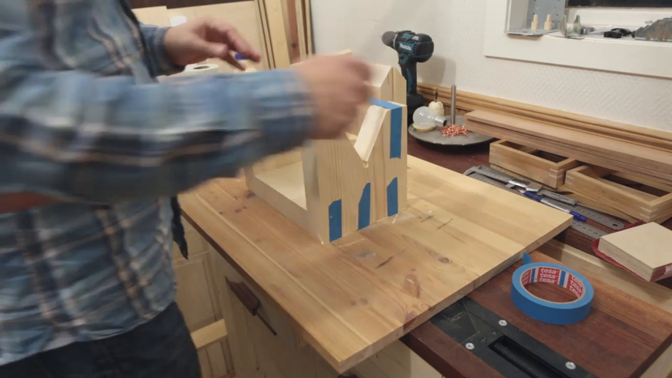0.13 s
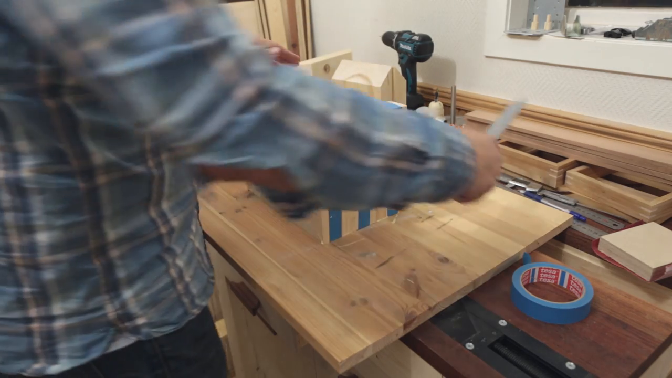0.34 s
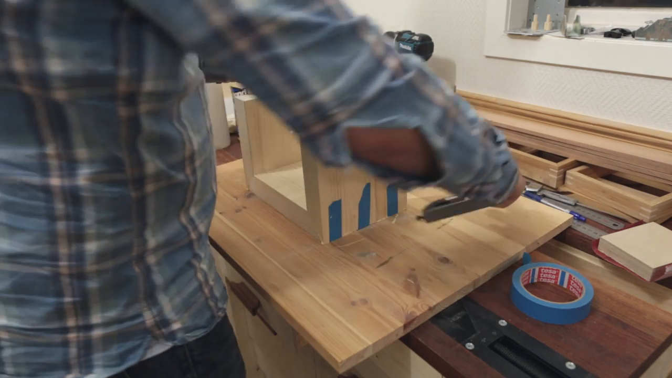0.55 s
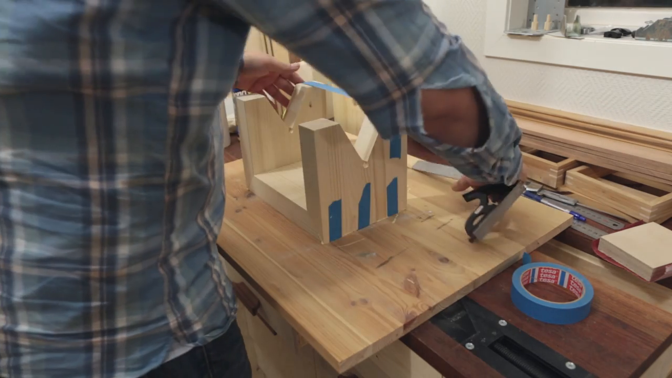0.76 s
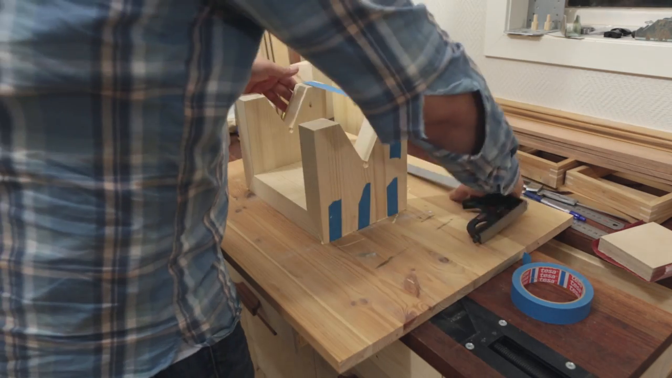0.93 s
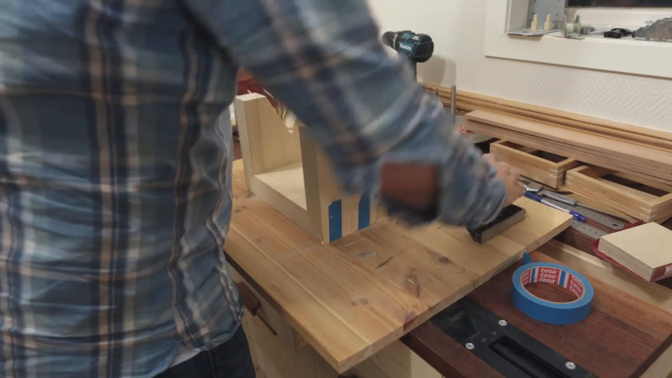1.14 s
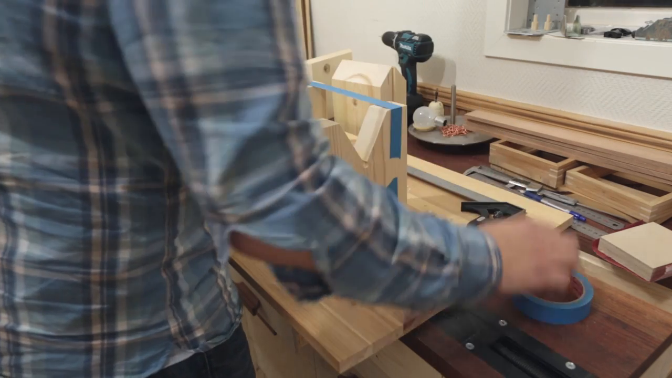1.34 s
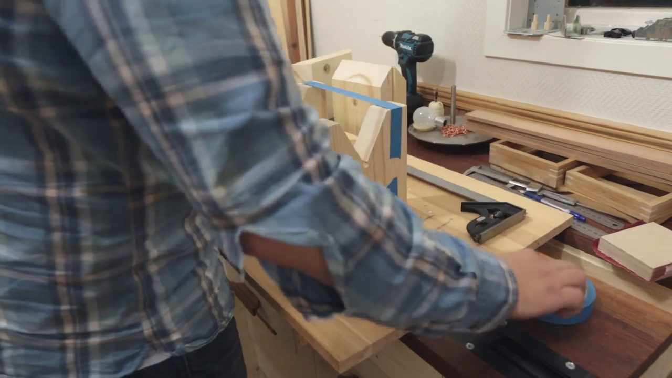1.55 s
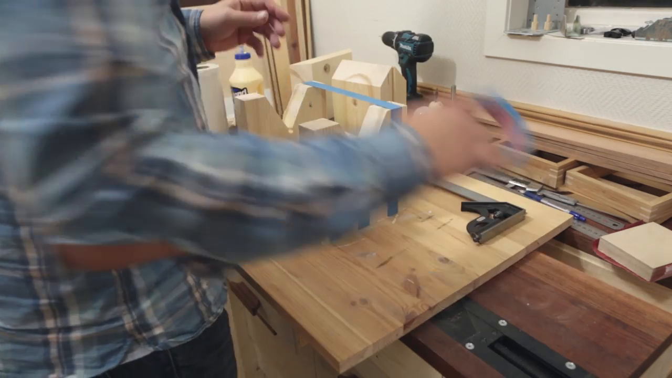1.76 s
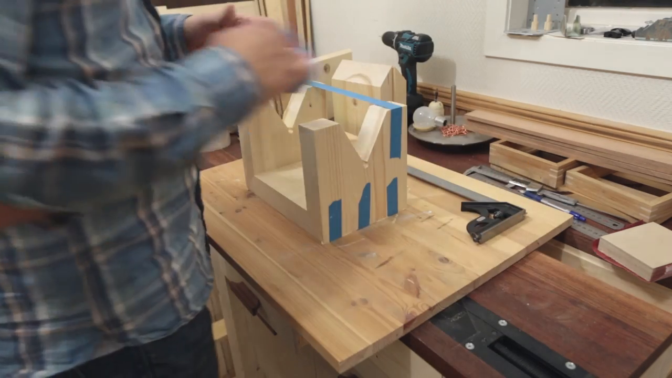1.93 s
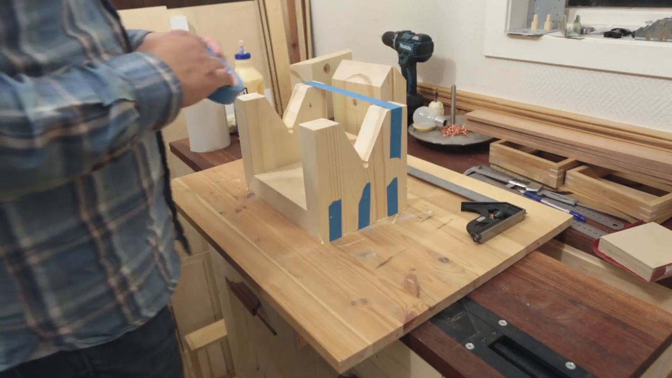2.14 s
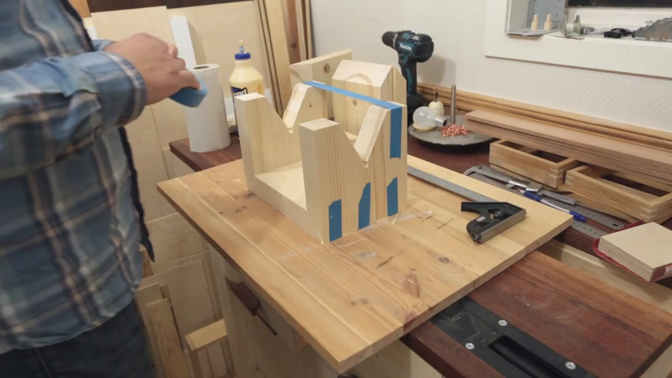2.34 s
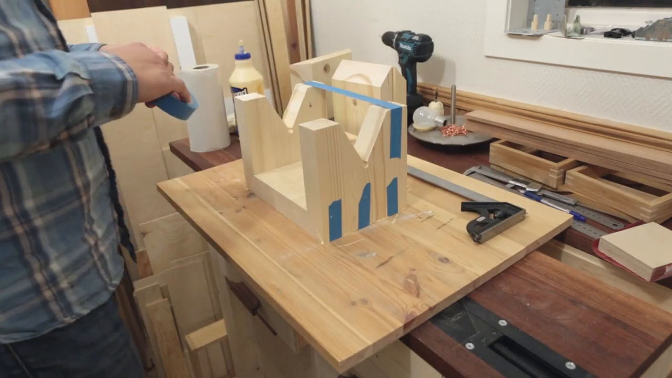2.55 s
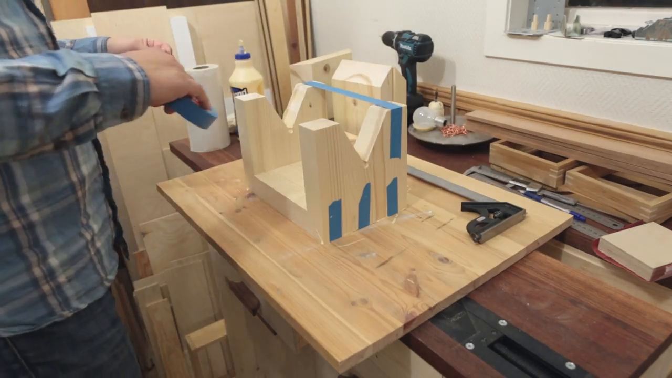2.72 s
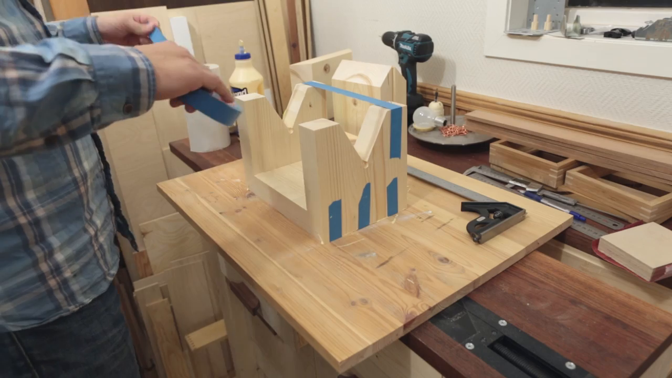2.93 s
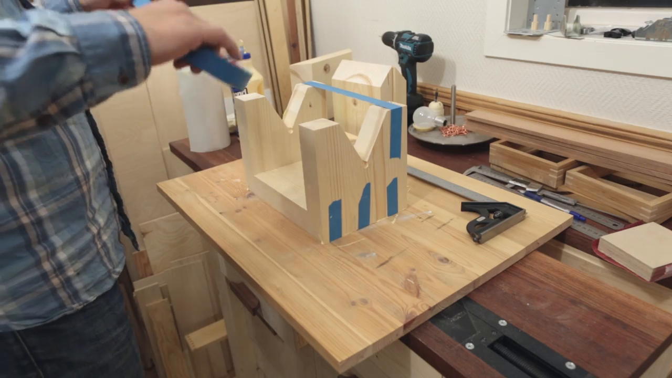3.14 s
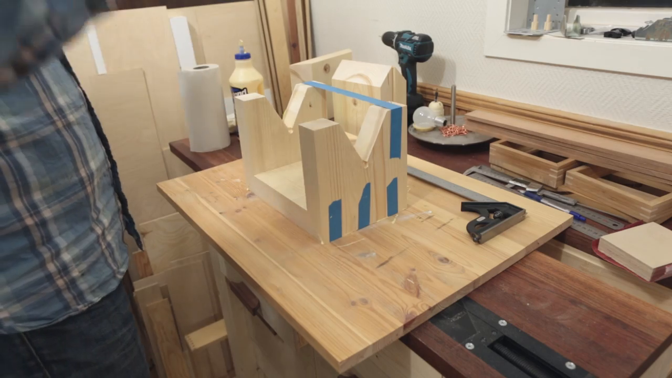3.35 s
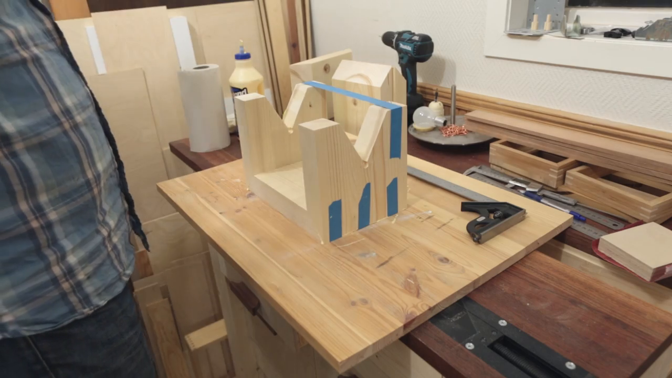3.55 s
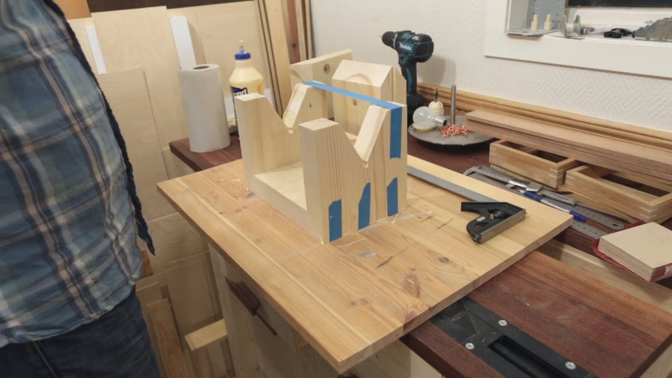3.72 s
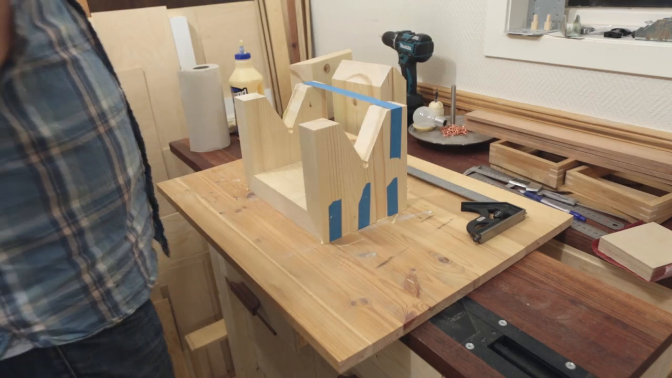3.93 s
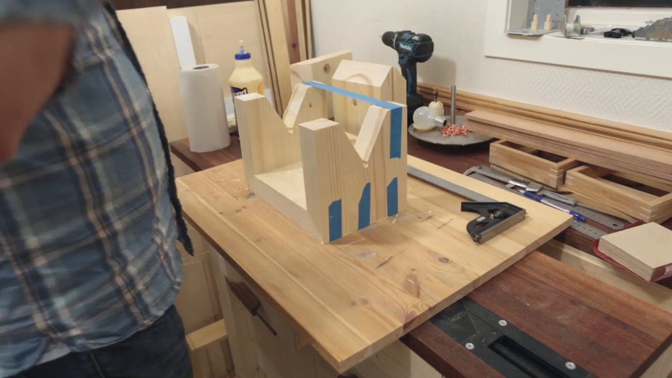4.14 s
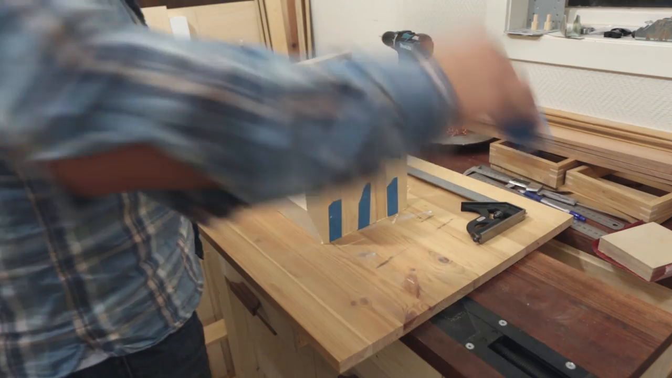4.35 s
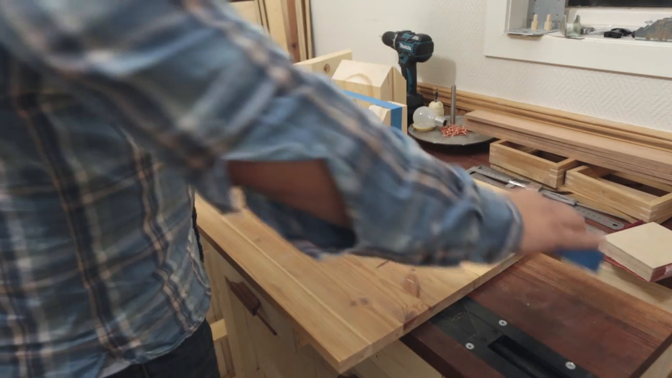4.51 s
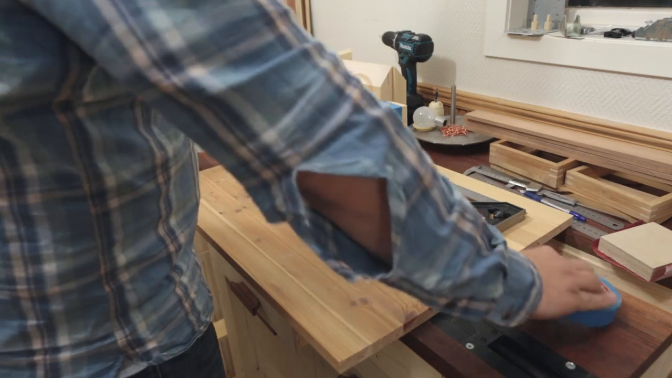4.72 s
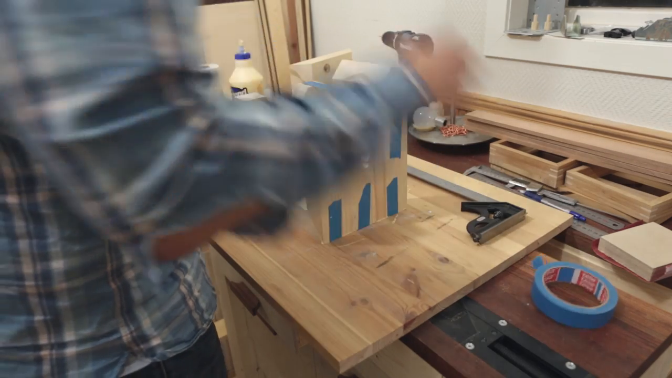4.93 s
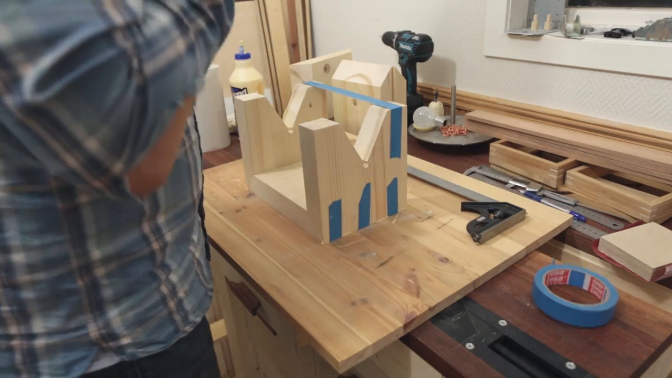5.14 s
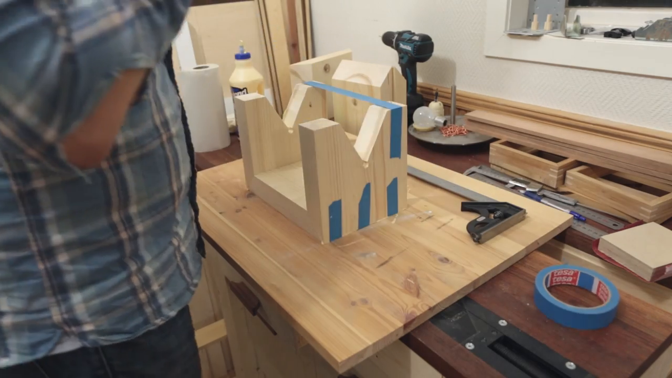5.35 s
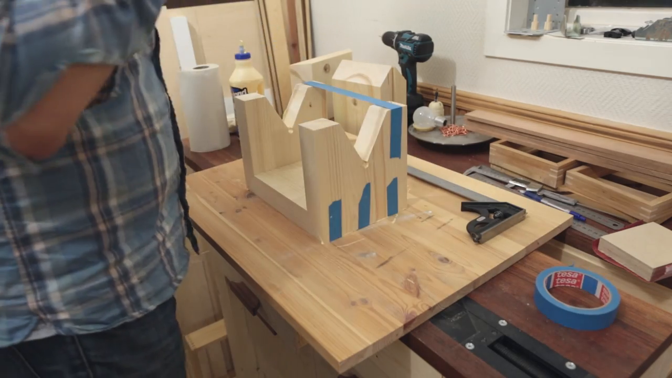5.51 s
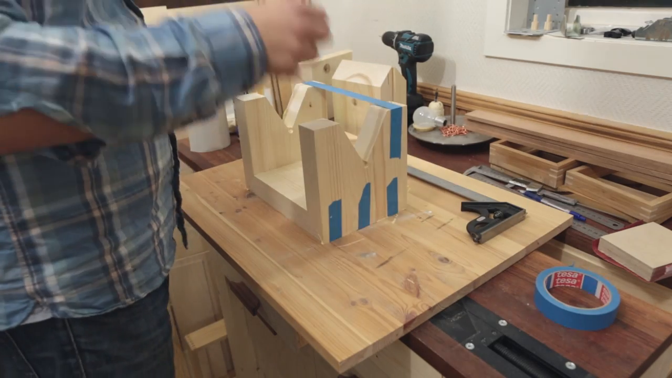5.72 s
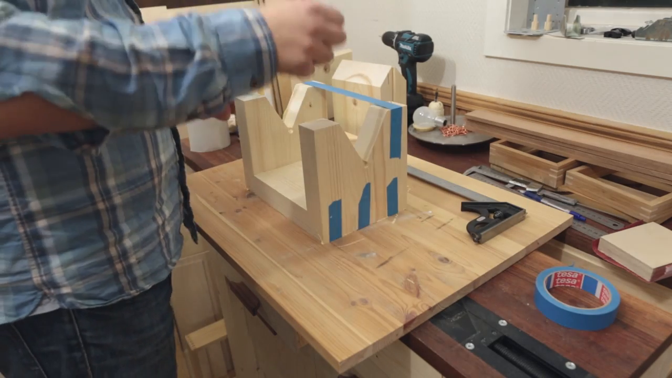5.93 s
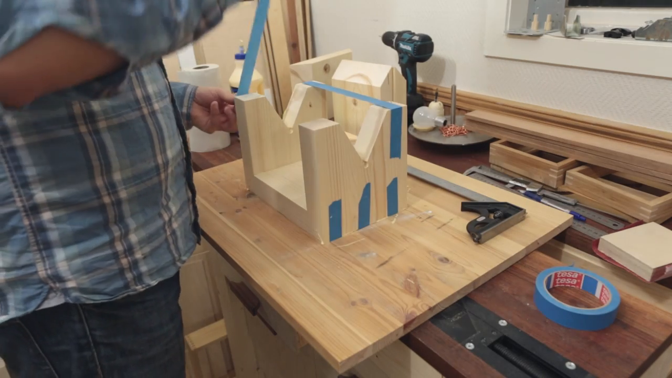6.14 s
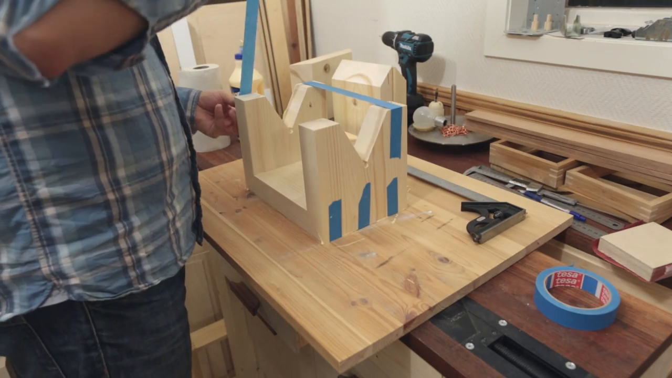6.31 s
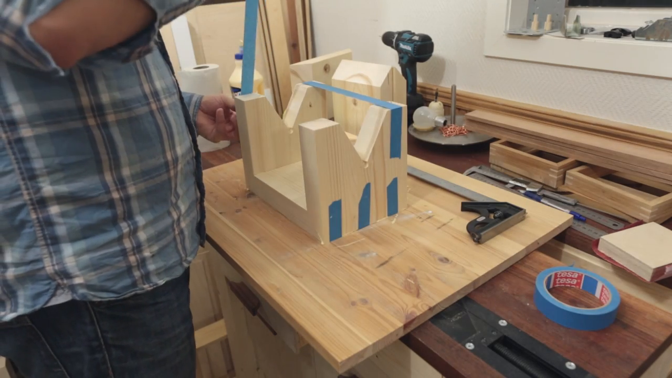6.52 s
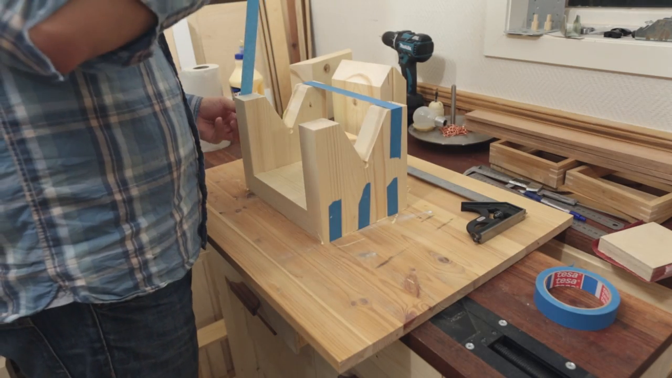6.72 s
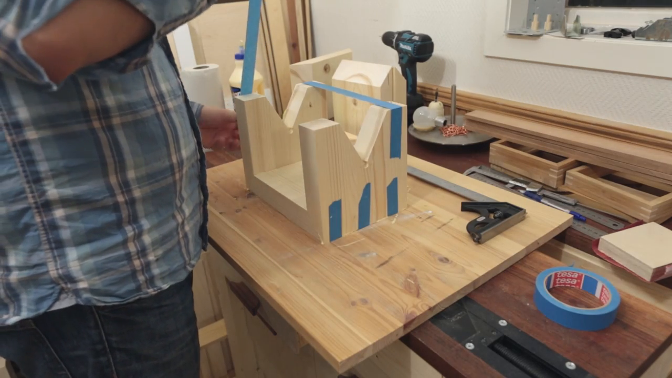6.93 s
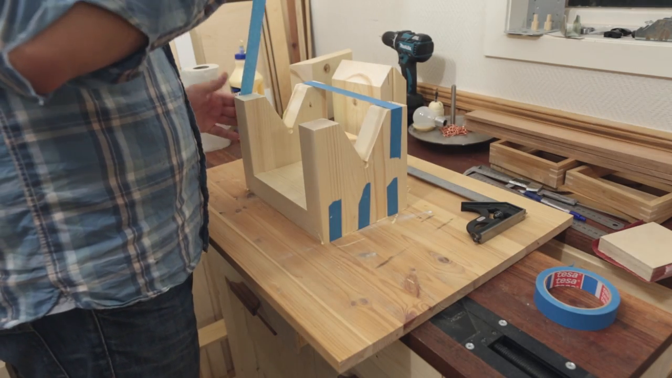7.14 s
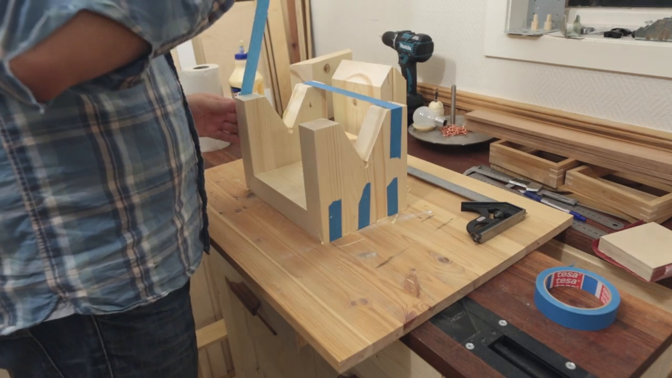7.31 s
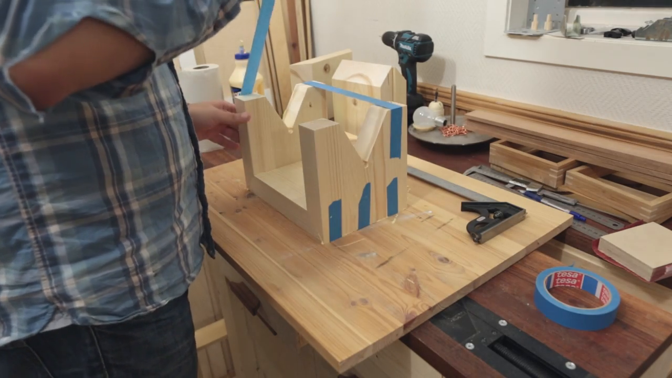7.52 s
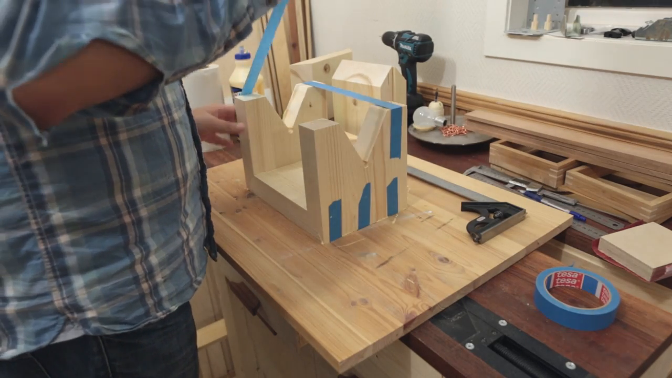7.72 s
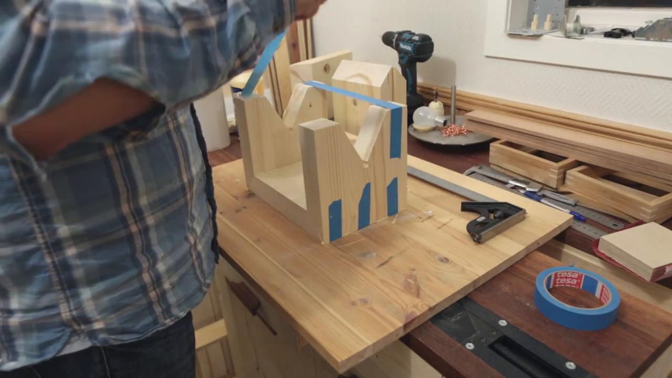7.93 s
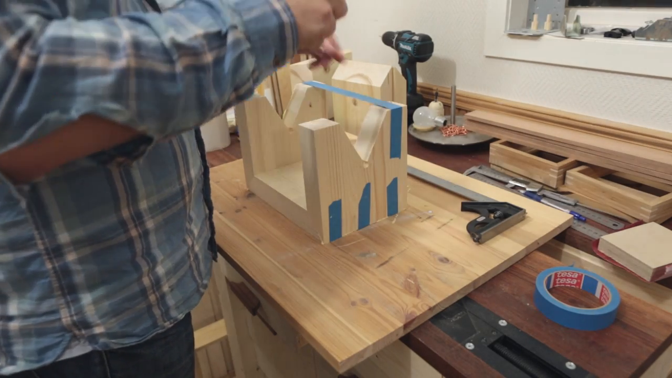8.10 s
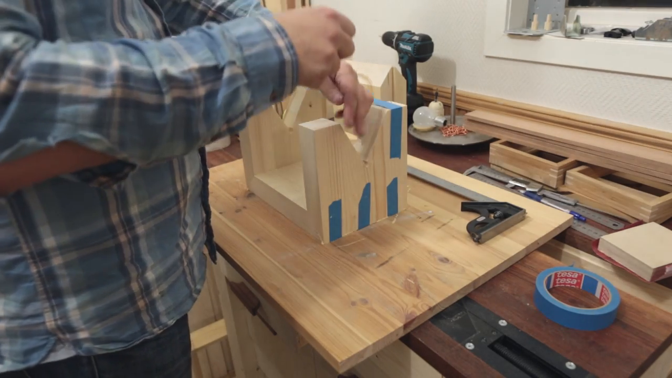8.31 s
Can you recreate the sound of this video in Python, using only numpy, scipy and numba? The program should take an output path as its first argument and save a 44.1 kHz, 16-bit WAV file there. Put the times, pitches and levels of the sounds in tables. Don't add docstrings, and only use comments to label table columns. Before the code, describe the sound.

Workshop handling: a hand knock, a hard metal-on-wood clatter, harsh peeling and tearing of tape, a roll rocking faster until flat, faint smoothing rustles.

```python
import sys
import numpy as np
from scipy import signal
from scipy.fft import rfft, irfft
from scipy.io import wavfile
from scipy.ndimage import uniform_filter1d
from numba import njit

SR = 44100
rng = np.random.default_rng(int(sys.argv[2]) if len(sys.argv) > 2 else 0)


def int16_out(signal):
    q = np.round(np.clip(np.atleast_2d(signal).T, -1, 1) * 32767)
    wavfile.write(sys.argv[1], SR, q.astype(np.int16))


def natural_amplitude(level_db):
    exponent = np.asarray(level_db, float) / 20
    return 10 ** exponent


N = 369116


def at_hz(points, hz):
    table = np.array(points)
    return np.interp(np.log(hz), np.log(table[:, 0]), table[:, 1])


def rms_one(x):
    return x / np.sqrt(np.mean(x ** 2) + 1e-20)


def in_time(tables):
    t, rows = np.arange(N) / SR, np.vstack(tables)
    gate = sum((t >= p[0][0]) & (t < p[-1][0]) for p in tables) * 1.
    columns = [np.interp(t, rows[:, 0], c) for c in rows.T[1:]]
    return uniform_filter1d(gate, size=64), columns


def coloured(x, points):
    hz = np.maximum(np.arange(N // 2 + 1) * SR / N, 10)
    return rms_one(irfft(rfft(x) * natural_amplitude(at_hz(points, hz)), N))


def passband(x, lo_hz, hi_hz):
    band_hz = [lo_hz, min(hi_hz, .45 * SR)]
    return signal.sosfilt(signal.butter(2, band_hz, "band", fs=SR, output="sos"), x)


def ring(clicks, hz, t60):
    r, w = natural_amplitude(-60 / (t60 * SR)), 2 * np.pi * hz / SR
    return signal.lfilter([0, np.sin(w)], [1, -2 * r * np.cos(w), r * r], clicks + 1e-18)


@njit
def gliding(x, hz, r, sr):
    y = np.zeros(len(x))
    for i in range(2, len(x)):
        y[i] = x[i] - x[i - 2] + 2 * r * np.cos(2 * np.pi * hz[i] / sr) * y[i - 1] - r * r * y[i - 2]
    return y


def grains(per_s, spread_db):
    heights = natural_amplitude(spread_db * np.minimum(rng.exponential(1, N), 5))
    sizes = rms_one(heights) * rng.choice([-1, 1], N)
    chance = np.clip(per_s / SR, 1e-4, 1)
    return sizes * (rng.random(N) < chance) / np.sqrt(chance)


def strokes(rows):
    t, out = np.arange(N) / SR, np.full((2, N), -150.)
    for s, *rise, fall, level_db, over_db in rows:
        rise_s = abs(rise[0] if rise else 1 / SR)
        shape_db = level_db - 20 * np.where(t < s, (s - t) / rise_s, (t - s) / abs(fall))
        out = np.maximum(out, [shape_db, shape_db + over_db])
    return out


def body(modes, blows, rub, crack_db, rub_trim_db, contacts_per_s):
    s, strength_db, heft_db, hardness_db, *knock_db = np.transpose(blows)
    at = (s * SR).astype(int)
    tilt_db = np.c_[heft_db, np.outer(hardness_db, range(4))]
    tilt_db[:, 2] += sum(knock_db)
    colour_db = strength_db[:, None] + tilt_db - [-4.5, -2.0, -2, 6.5, 5.5]
    rumble_db, scrape_db = strokes(rub)
    luck, out = rng.normal(0, 1, (len(s), len(modes))), np.zeros(N)
    for k, (hz, mode_db, t60) in enumerate(modes):
        place = np.interp(np.log2(hz), np.log2([340, 560, 1050, 2200, 5000]), range(5))
        blow_db = np.array([np.interp(place, range(5), c) for c in colour_db]) + 1.5 * luck[:, k] - 6.0
        force = np.zeros(N)
        force[at] = natural_amplitude(blow_db) * (-1) ** int(2 * place)
        rub_db = rumble_db + (scrape_db - rumble_db) * np.clip(place - 1, 0, 1)
        rub_db = rub_db - 10.0 * max(place - 2, 0) + rub_trim_db
        force += natural_amplitude(rub_db) * grains(contacts_per_s, spread_db=4.5) / np.sqrt(t60)
        out += natural_amplitude(mode_db) * ring(force, hz, t60)
    cracks = [(1, 430.0, 1700.0, 0.0027), (3, 990.0, 3200.0, 0.02), (4, 1400.0, 5800.0, 0.0067)]
    for column, lo_hz, hi_hz, fade_s in cracks:
        crack = np.zeros(N)
        crack[at] = natural_amplitude(colour_db[:, column] + crack_db)
        fading = signal.lfilter([1], [1, -np.exp(-1 / (fade_s * SR))], crack)
        out += passband(fading * rng.standard_normal(N), lo_hz, hi_hz)
    return out


SNAP_SLOPE_DB = 13


def snaps(rows, sharp, fibre_share, fibre_s):
    s, level_db, hz = np.transpose(rows)
    fibres, out = grains(9000., spread_db=5.0), 0
    for lo_hz, hi_hz, pulse_db in [(890.0, 3350.0, 32.6), (2160.0, 7200.0, 23.0), (3800.0, 15000., 22.3)]:
        octaves_off = np.abs(np.log2(hz / np.sqrt(lo_hz * hi_hz)))
        pulse = np.zeros(N)
        pulse[(s * SR).astype(int)] = natural_amplitude(level_db - SNAP_SLOPE_DB * octaves_off + pulse_db)
        after = signal.lfilter([0, fibre_share], [1, -np.exp(-1 / (fibre_s * SR))], pulse) * fibres
        out = out + passband(sharp * pulse + after, lo_hz, hi_hz)
    return out


# start_s, strength_db, heft_db, hardness_db (per step up), steel_knock_db
TOOL_BLOWS = [(0.8545, -24, 15, -4, 5), (0.874, -22, 13, -5, -6), (0.9095, -6, -9, -3.5, -5),
              (0.94, -13, -4, -10, -3), (1.135, -16, 3, -5, 16), (1.155, -22, 5, -4, 11),
              (1.177, -12, -6, -7, -4), (1.201, -12, -6, -12, 5), (1.229, -10, -12, -8, 6),
              (1.244, 1, -21, -3, -2), (1.248, -6, -18, -4, 3), (1.269, -15, -12, -1, 2)]
# pitch_hz, level_db, t60_s
BOARD_AND_TOOL_MODES = [(205, -19., .08), (291, -3., .11), (339, -2., .13), (400, -6., .1), (462, -6., .08),
                        (544, -6., .09), (587, -6., .09), (700, -8., .07), (800, -6., .08), (996, -4., .1),
                        (1044, -5., .1), (1160, -4., .1), (1350, -9., .05), (1640, -8., .06),
                        (1990, -12., .02), (2353, -11., .04), (2735, -12., .02), (3150, -11., .025),
              (4250, -14., .03), (5250, -12., .02), (6620, -10., .04), (10900, -27., .06)]
# start_s, fall_s (per 20 dB), rumble_db, scrape_db (over rumble)
TOOL_SCUFFS = [
    (.856, 0.0864, -12.5, -16.5),
    (0.909, 0.0365, -4.5, -23.5),
    (1.136, 0.07, -20, 14.5),
    (1.156, 0.1058, -8.5, -9.5),
    (1.229, 0.07, -14, 2),
    (1.246, 0.0349, -8, 10),
    (1.29, 0.166, -24, -6),
]


def tool_on_board():
    return body(BOARD_AND_TOOL_MODES, TOOL_BLOWS, TOOL_SCUFFS,
                crack_db=5.5, rub_trim_db=-40.5, contacts_per_s=400.)


# start_s, level_db
PULLS = [
    [(2.47, -60.5), (2.543, -43.5), (2.571, -34.5), (2.591, -38), (2.655, -16.5), (2.707, -17.5),
     (3.015, -21.5), (3.103, -24.5), (3.14, -36)],
    [(3.14, -34.5), (3.18, -33), (3.19, -20.5), (3.215, -24.5), (3.25, -20), (3.295, -22.5), (3.308, -26.5),
     (3.331, -18), (3.357, -45)],
    [(3.444, -28.5), (3.45, -28), (3.464, -27.5), (3.48, -36), (3.59, -70)],
    [(4.11, -65.5), (4.13, -53), (4.166, -34), (4.2, -35)],
]
# pitch_hz, level_db (per Hz)
GLUE_SPECTRUM = [(1290, -19), (2200, -9.5), (2750, -3.5), (3090, -1), (5250, -1.5), (7680, -2.5),
                 (10900, -3.5), (15000, -6), (15900, -17)]
# pitch_hz, level_db (per Hz)
STRIP_SPECTRUM = [(59, -66), (100, -26), (199, -7), (331, -6), (399, -1.5), (663, -6), (1200, -5),
                  (1560, -14), (2640, -120)]
TORN_S = 4.0
SHORT_HZ, LONG_HZ, SINK_LENGTH = 2900., 1200., .42
SHORT_FLAP_DB, LONG_FLAP_DB, FLAP_LENGTH = -32, -10.5, 0.17
RING_DB = -9
OVER_HZ, OVER_HZ_PER_DB = 4860, 43


def peel():
    gate, (hiss_db,) = in_time(PULLS)
    freed = np.cumsum(gate * natural_amplitude(hiss_db))
    freed = freed / freed[-1] * (np.arange(N) < TORN_S * SR)
    strip_hz = LONG_HZ + (SHORT_HZ - LONG_HZ) * np.exp(-freed / SINK_LENGTH)
    flap_db = hiss_db + LONG_FLAP_DB + (SHORT_FLAP_DB - LONG_FLAP_DB) * np.exp(-freed / FLAP_LENGTH)
    over_hz = OVER_HZ + OVER_HZ_PER_DB * (hiss_db + 20)
    slips = grains(5000., spread_db=1.0)
    bursts = np.convolve(np.abs(grains(250.0, spread_db=1.5)), np.hanning(128))[:N]
    front = (slips + .7 * rng.standard_normal(N)) * (1 + .035 * bursts)
    overtone = rms_one(gliding(front, over_hz, natural_amplitude(-.3), SR))
    hiss = coloured(front, GLUE_SPECTRUM) + .13 * overtone
    flap = coloured(front, STRIP_SPECTRUM)
    strip = rms_one(gliding(front, strip_hz, natural_amplitude(-.3), SR))
    return gate * (natural_amplitude(hiss_db) * hiss + natural_amplitude(flap_db) * flap + natural_amplitude(hiss_db + RING_DB) * strip)


# start_s,
# level_db, pitch_hz (centre)
SHARP_SNAPS = [(1.627, -51, 1800), (2.048, -47, 1700), (2.328, -44.5, 1788), (2.5435, -30, 5000),
               (3.1595, -19, 5994), (3.4465, -24, 5512), (4.039, -34, 4200), (4.047, -43.5, 9000),
               (4.088, -47, 6000), (4.149, -37.5, 5490), (4.157, -34, 8930), (4.1675, -35.5, 8070),
               (4.1755, -22.5, 8020), (4.181, -25.5, 8990), (4.194, -22.5, 7990), (4.1965, -17, 7002),
               (4.2085, -1.5, 4130), (4.211, -9.5, 5000), (4.9115, -25.5, 4990), (6.8265, -28.5, 4147),
               (6.907, -29, 7060), (6.914, -21.5, 5190), (7.05, -43, 6010)]


def sharp_snaps():
    return snaps(SHARP_SNAPS, sharp=0.96, fibre_share=.08, fibre_s=0.0032)


# start_s, strength_db, heft_db, hardness_db (per step up)
BENCH_KNOCKS = [
    (0.0634, -39.5, 3, -16),
    (0.103, -19, -9, -4.5),
    (1.7345, -29.5, -11, -39),
    (1.767, -53.5, 6, 2.5),
    (1.911, -42, -3.5, -22),
    (4.761, -26, -3.5, -7),
    (4.791, -32.5, -4.5, -15),
    (6.91, -52, 8.5, 7.5),
    (6.938, -58.5, 7, 3),
]
# pitch_hz, level_db, t60_s
BENCH_MODES = [(130, 2.5, 0.12), (240, -2, 0.063), (336, 4.5, 0.11), (436, -0.5, 0.055), (529, 0, 0.074),
               (625, 5.5, 0.052), (766, 8.5, 0.047), (996, 7.5, 0.021), (1167, 4, 0.024),
               (1380, -5.5, 0.033), (2100, -3, .02)]
# peak_s, rise_s and fall_s (per 20 dB), rumble_db, scrape_db (over rumble)
HAND_SLIDES = [
    (0.075, 0.07235, -0.34, -40, -10),
]
# start_s, fall_s (per 20 dB), rumble_db, scrape_db (over rumble)
ROLL_SKIDS = [
    (0.104, .06, -31, -8),
    (1.735, 0.057, -30.5, -27),
    (1.912, 0.062, -39.5, -30),
    (4.764, 0.048, -30, -7),
    (4.8, .08, -47, -22),
    (6.915, .25, -47.5, -11.5),
]


def knocks_on_bench():
    return body(BENCH_MODES, BENCH_KNOCKS, HAND_SLIDES + ROLL_SKIDS,
                crack_db=0.5, rub_trim_db=-45.0, contacts_per_s=1300.0)


RIM_ROCKS = [4.9, 4.997, 5.087, 5.167, 5.244, 5.317, 5.383, 5.439, 5.49, 5.536, 5.568, 5.615]
# pitch_hz, level_db, t60_s
ROLL_MODES = [(138, -3.5, 0.11), (238, -6, .08), (339, 10, .3), (466, -2.5, 0.066), (628.4, 5, .06),
              (774, 2, .05), (1090, -1, 0.033), (1700, 0, .03)]
# start_s, strength_db, heft_db, hardness_db (per step up)
LAST_BUMPS = [
    (5.542, -35.5, -6.5, -3.5),
    (5.61, -32.5, -8, -3.5),
]
TICK_DB, TICK_LOSS_DB, TICK_LEAST_DB, TICK_HZ = -29, 3.0, -40, 2500.
REBOUND_S, REBOUND_DB, REBOUND_LOSS_DB = .011, -22.5, 10
ROLL_DB, ROLL_GAIN_DB_PER_S, ROLL_SCRAPE_DB, SETTLED_S = -39, 10, -19.5, 5.65
ROLL_LAG_S, ROLL_RISE_S, ROLL_FALL_S = .012, 0.021, 0.1


def rocking_roll():
    pitches = TICK_HZ * 2 ** rng.normal(0, 0.21, len(RIM_ROCKS))
    ticks = []
    for k, (s, hz) in enumerate(zip(RIM_ROCKS, pitches)):
        ticks.append((s, max(TICK_DB - TICK_LOSS_DB * k, TICK_LEAST_DB), hz))
        if k < 3:
            ticks.append((s + REBOUND_S, REBOUND_DB - REBOUND_LOSS_DB * k, hz))
    rolls = []
    for s in list(RIM_ROCKS) + [SETTLED_S - ROLL_LAG_S]:
        rumble_db = ROLL_DB + ROLL_GAIN_DB_PER_S * (s - RIM_ROCKS[0])
        rolls.append((s + ROLL_LAG_S, ROLL_RISE_S, ROLL_FALL_S, rumble_db, ROLL_SCRAPE_DB))
    rumble = body(ROLL_MODES, LAST_BUMPS, rolls, crack_db=4.0, rub_trim_db=-44.0, contacts_per_s=1300.0)
    return rumble + snaps(ticks, sharp=.25, fibre_share=.12, fibre_s=.004)


# start_s, strength_db, heft_db, hardness_db (per step up)
BOX_TAP = [
    (5.783, -34, -10, 1.5),
]
# pitch_hz, level_db, t60_s
BOX_MODES = [(296, -6.5, .1), (1246, 7, 0.051), (1450, 1.5, 0.093), (3458.7, -2, 0.0432),
             (4530, -10, 0.0359)]
# peak_s, rise_s and fall_s (per 20 dB), rumble_db, scrape_db (over rumble)
SMOOTHING = [
    (5.8, 0.01119, 0.05146, -60, 5),
    (5.935, 0.055, .3, -67, 13.5),
    (7.68, 0.2125, 0.28, -62, 5.2),
    (7.83, 0.325, 0.037, -68, 15.4),
]


def strip_on_box():
    return body(BOX_MODES, BOX_TAP, SMOOTHING, crack_db=-4.0, rub_trim_db=-40.5, contacts_per_s=4600.0)


# peak_s, rise_s and fall_s (per 20 dB), soft_db, bright_db (over soft)
RUSTLE = [(.086, .15, .07, -50, -5), (.25, .5, .5, -61, -3), (.62, .6, .5, -61, -7),
          (1.63, .02, .03, -54, -15), (1.8, .15, .2, -57, -10), (4.09, .03, .03, -60, 6),
          (5.45, .06, .1, -61, 4), (5.6, .25, .04, -55, -5), (6.75, .06, .3, -56, -5),
          (6.905, .05, .02, -45, 1), (7.055, .3, .025, -56, 4), (7.44, .2, .2, -54, 0),
          (7.76, .5, .04, -62, -3)]
# start_s, fall_s (per 20 dB), soft_db, bright_db (over soft)
CRACKLE = [
    (2.05, .1, -56, -15),
    (4.041, .035, -45, 0),
    (4.913, .03, -41, -6),
    (6.828, .025, -41, -2),
    (6.916, .05, -39, -8),
]


def rustle():
    level_db, bright_db = strokes(RUSTLE + CRACKLE)
    fibres = grains(1500., spread_db=3.0) + 1.8 * rng.standard_normal(N)
    soft = rms_one(passband(fibres, 2500, 7800))
    bright = rms_one(passband(fibres, 7000, 14000))
    return natural_amplitude(level_db + 3.1) * soft + natural_amplitude(bright_db + 2.5) * bright


# pitch_hz, t60_s
ROOM_T60 = [(100, 0.49), (500, 0.37), (1500, 0.43), (4000, 0.38), (11000, 0.32)]
# delay_s, level_db
ECHOES = [(.0023, -19), (.0045, -15), (.0068, -17.5), (.011, -23.5)]


def room(x, tail_db):
    t, edges = np.arange(SR // 2) / SR, 60 * 2 ** np.arange(0, 8.5, .5)
    white = rng.standard_normal((2, len(t)))
    tail = 0
    for k, (lo, hi) in enumerate(zip(edges, edges[1:])):
        decay = natural_amplitude(-60 * t / at_hz(ROOM_T60, np.sqrt(lo * hi)))
        tail = tail + passband(white[k % 2], lo, hi) * decay
    answer = natural_amplitude(tail_db) * tail * (1 - np.exp(-(t / 0.00064) ** 2))
    answer[0] += 1
    for s, echo_db in ECHOES:
        answer[int(s * SR)] += natural_amplitude(echo_db)
    return signal.fftconvolve(x, answer)[:N]


# pitch_hz, level_db (per Hz)
FLOOR_SPECTRUM = [(15, -57.5), (25, -24.5), (55, -5.5), (216, -4), (255, -2.5), (324, -5), (352, -2.5),
                  (729, -5.5), (834, -5.5), (1250, -7), (2090, -8.5), (9990, -14.5), (15800, -20.5)]
FLOOR_DB = -56


def noise_floor():
    return natural_amplitude(FLOOR_DB) * coloured(rng.standard_normal(N), FLOOR_SPECTRUM)


def scene():
    near = tool_on_board() + knocks_on_bench() + rocking_roll() + strip_on_box()
    near += peel() + rustle() + sharp_snaps()
    near = signal.sosfilt(signal.butter(3, 200., "high", fs=SR, output="sos"), near)
    return (natural_amplitude(-2.0) * room(near, tail_db=-35.0) + noise_floor())[None]


def roll_off(x):
    return signal.sosfilt(signal.butter(12, 16060, fs=SR, output="sos"), x)


def record(dry):
    mix = np.clip(dry, -.99, .99)
    return roll_off(mix)


dry = scene()
out = record(dry)
int16_out(out)
```